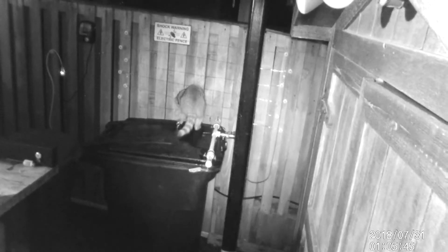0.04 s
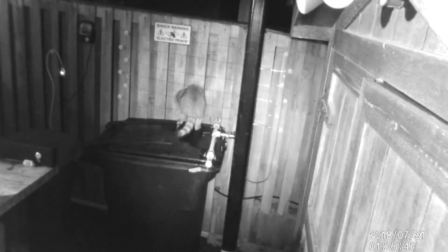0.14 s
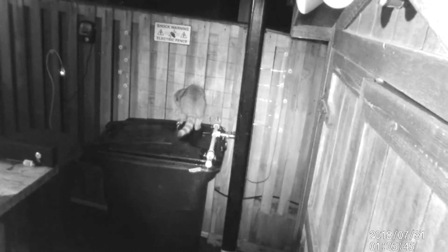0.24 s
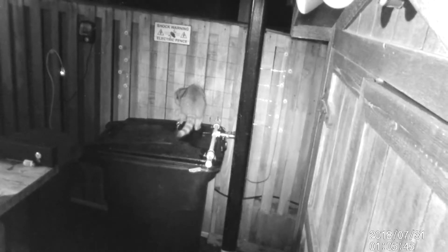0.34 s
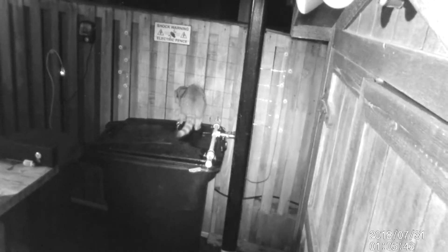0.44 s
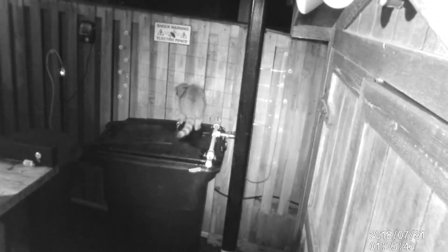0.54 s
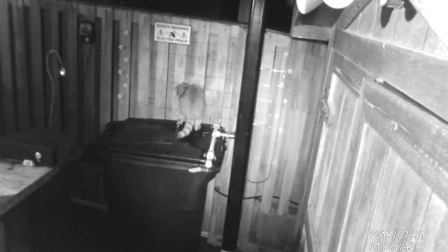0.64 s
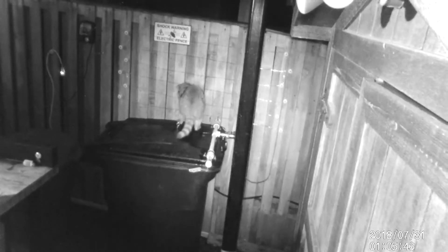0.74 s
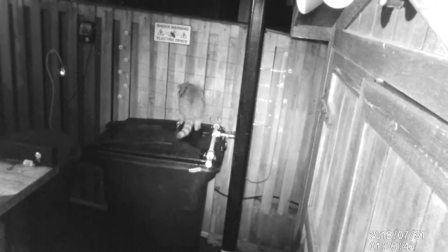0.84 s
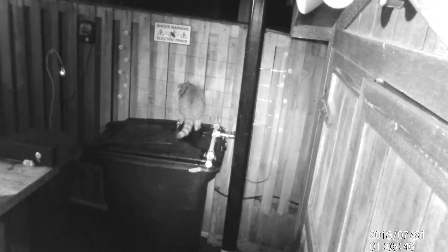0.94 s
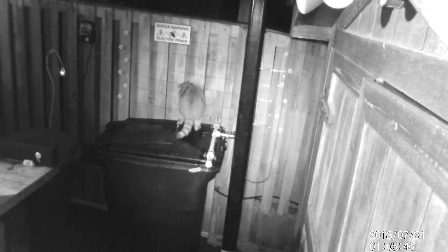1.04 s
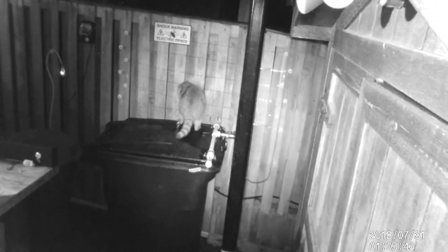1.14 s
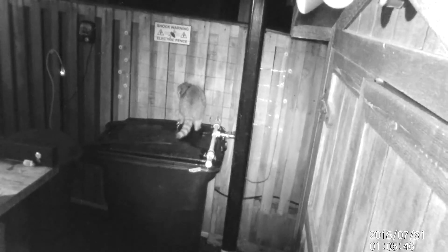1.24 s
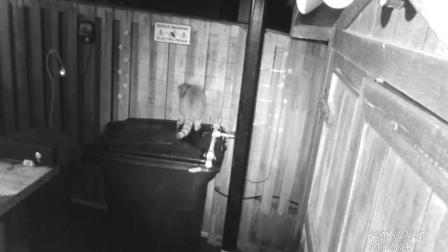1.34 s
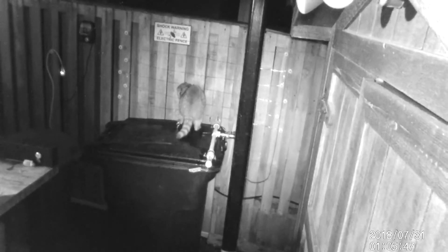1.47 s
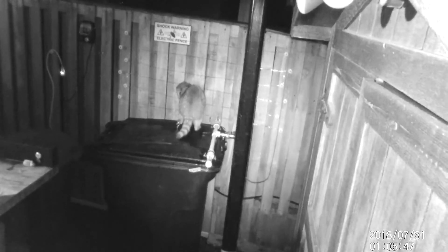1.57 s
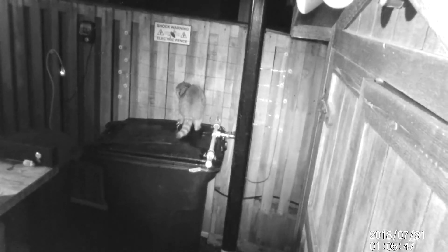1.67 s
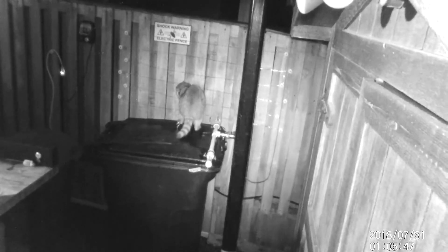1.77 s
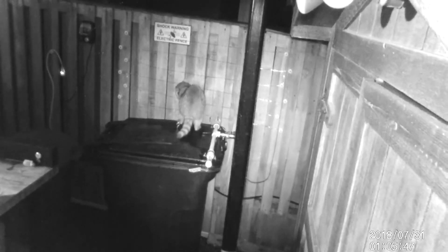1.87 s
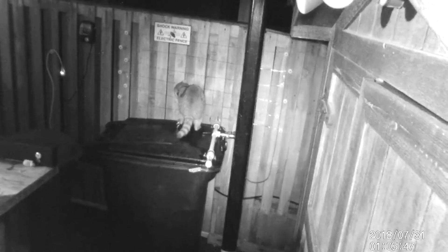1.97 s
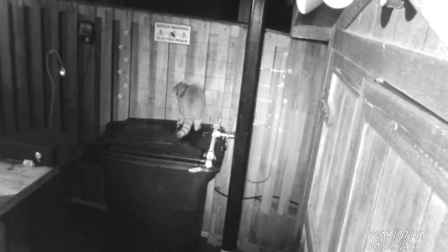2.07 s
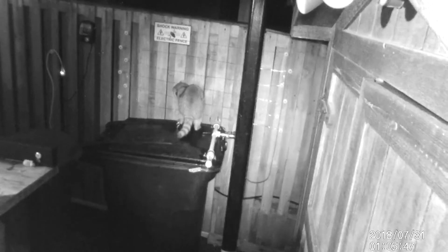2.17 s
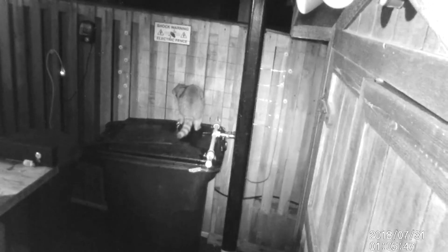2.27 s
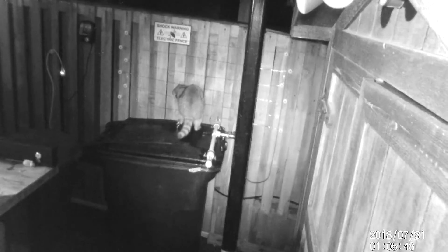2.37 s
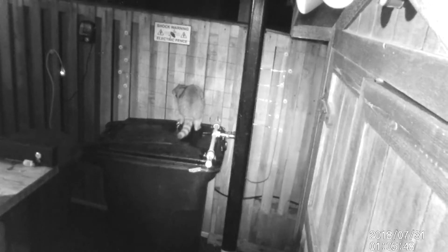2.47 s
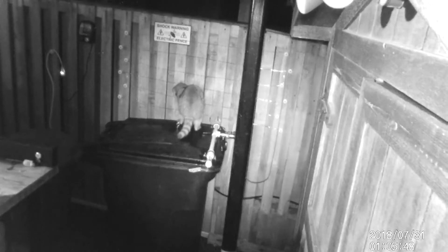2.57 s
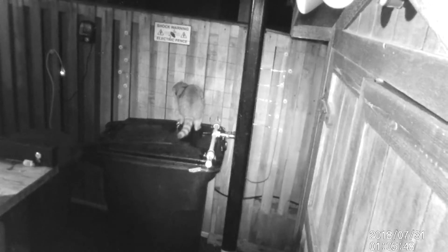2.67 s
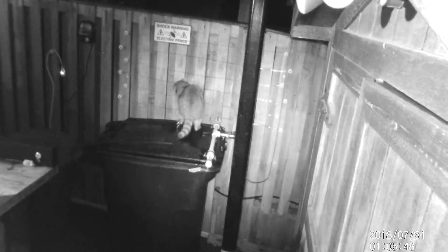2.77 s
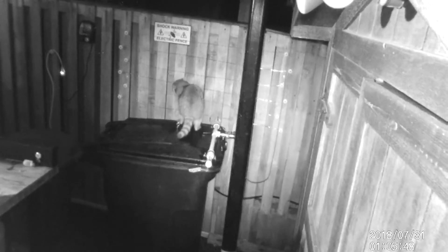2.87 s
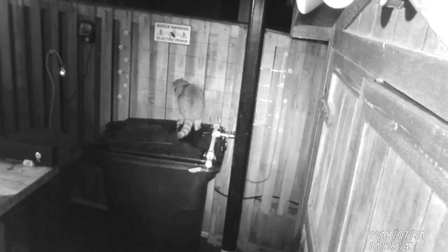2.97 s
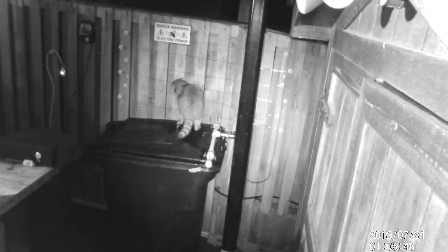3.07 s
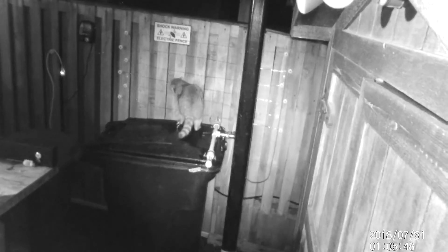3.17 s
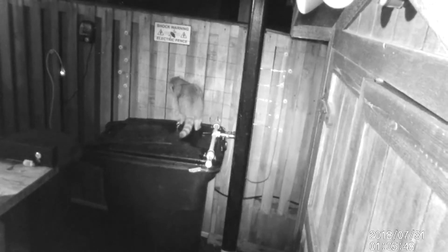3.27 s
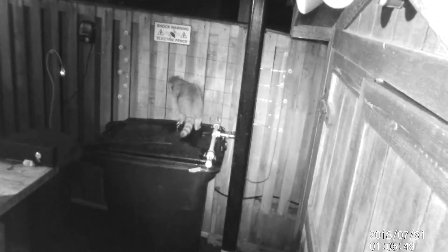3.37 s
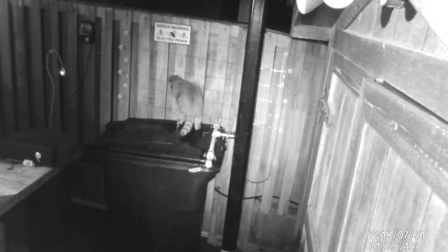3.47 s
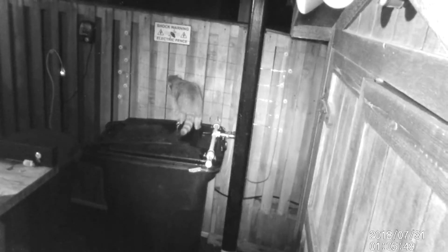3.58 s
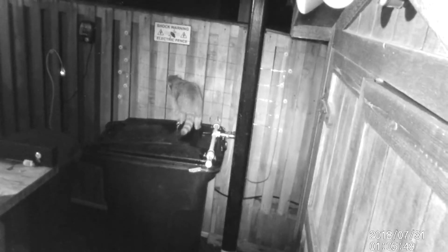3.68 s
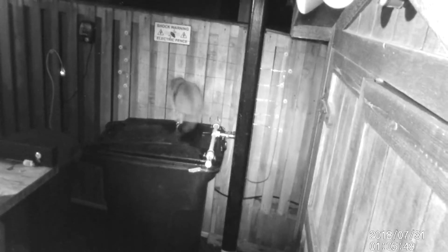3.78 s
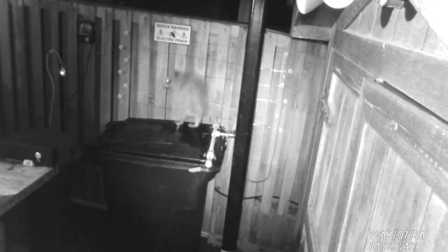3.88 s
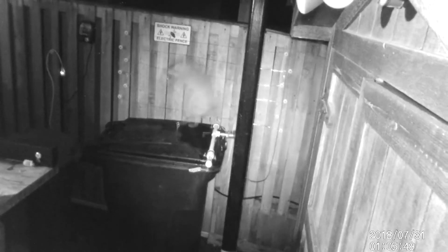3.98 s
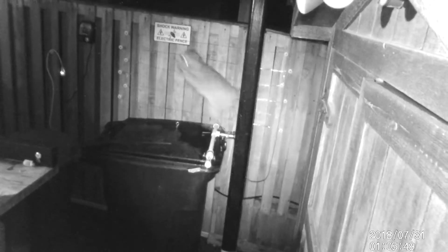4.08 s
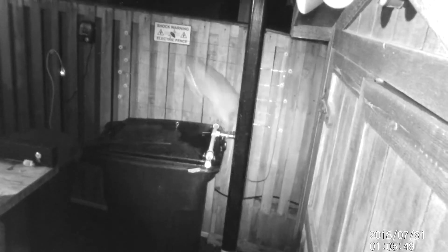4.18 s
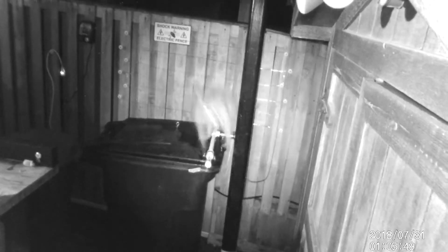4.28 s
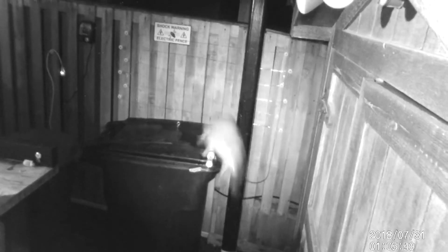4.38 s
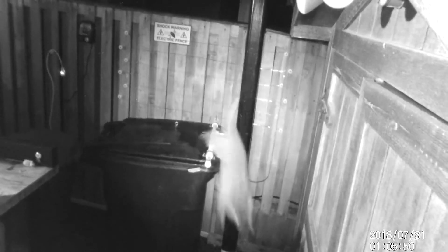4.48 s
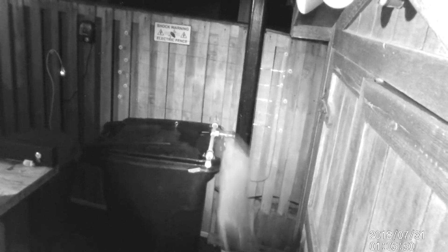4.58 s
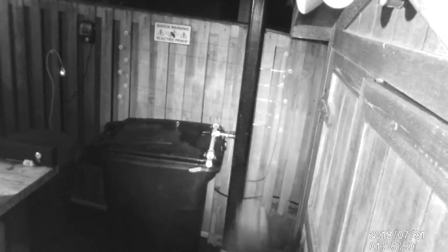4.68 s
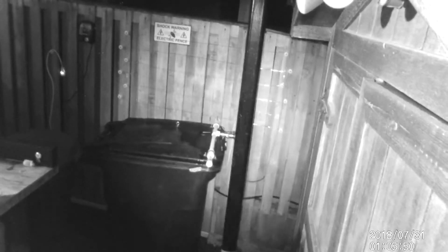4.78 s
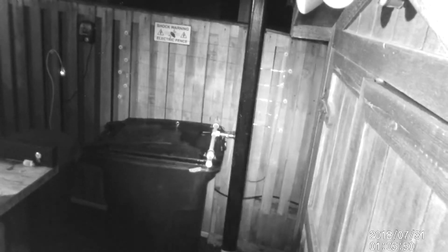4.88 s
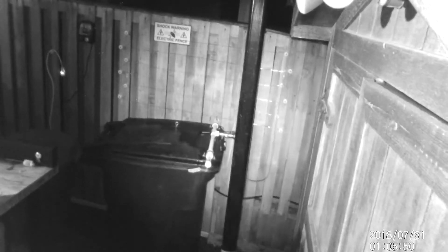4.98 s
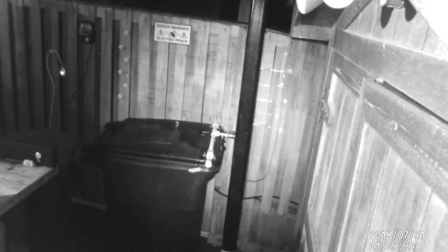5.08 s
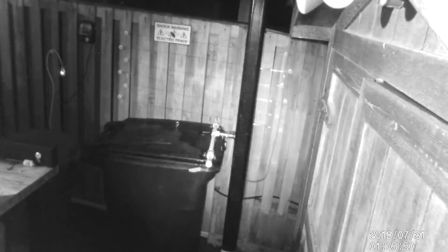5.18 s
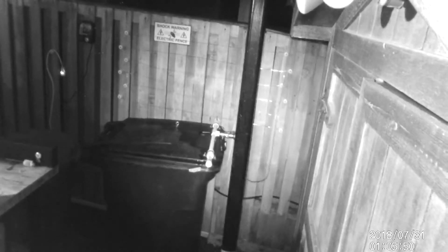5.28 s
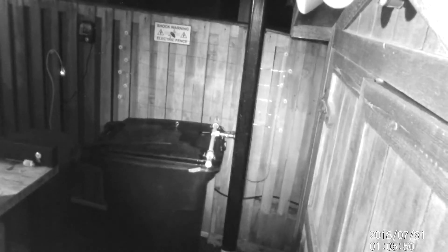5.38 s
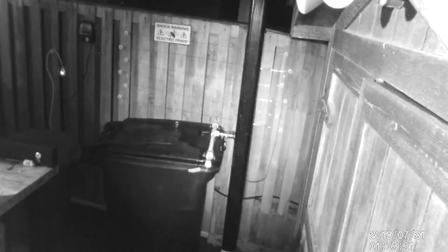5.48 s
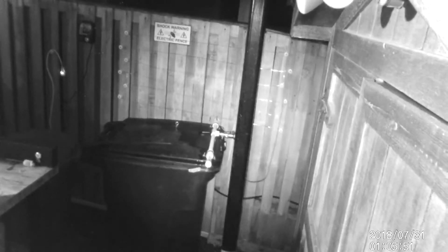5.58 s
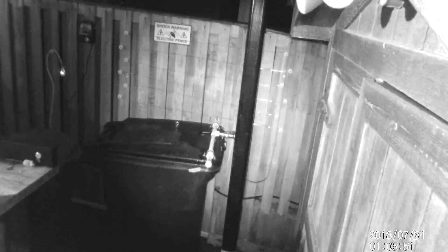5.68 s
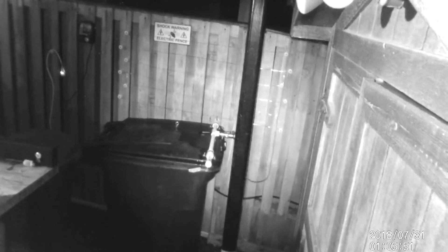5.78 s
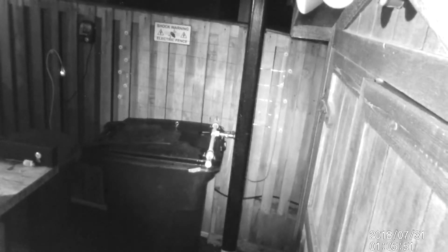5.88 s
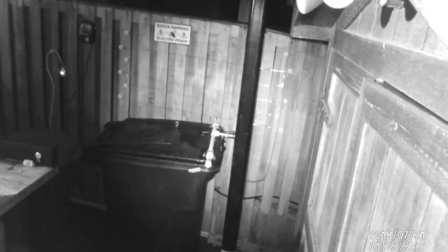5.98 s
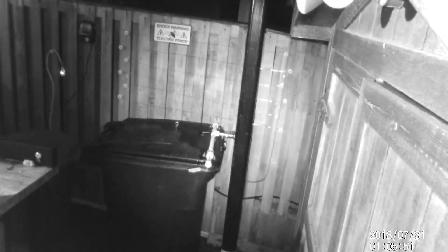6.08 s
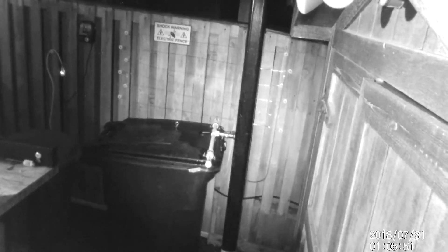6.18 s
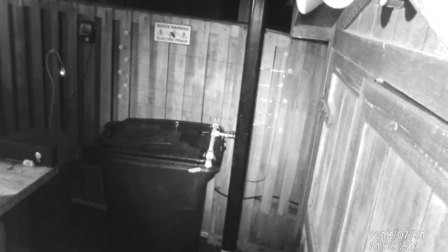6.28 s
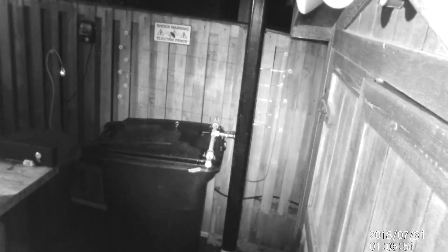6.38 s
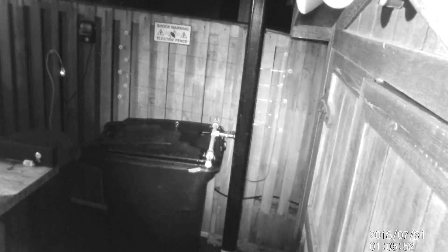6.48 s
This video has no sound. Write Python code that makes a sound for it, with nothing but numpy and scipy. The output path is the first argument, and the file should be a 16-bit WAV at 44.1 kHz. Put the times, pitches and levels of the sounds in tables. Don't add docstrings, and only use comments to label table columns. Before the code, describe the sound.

Quiet night hiss and cricket trills, then sudden clattering claws and booming bin knocks, a loud slapping landing, and faint footsteps running off.

```python
import sys
import numpy as np
from scipy import signal
from scipy.fft import rfft, irfft, next_fast_len
from scipy.io import wavfile
from scipy.ndimage import uniform_filter1d

SR = 44100
rng = np.random.default_rng(int(sys.argv[2]) if len(sys.argv) > 2 else 0)


def transcribe(signal):
    frames = np.atleast_2d(signal).T
    limited = np.clip(frames, -1, 1)
    pcm = np.round(limited * 32767).astype(np.int16)
    wavfile.write(sys.argv[1], SR, pcm)


def decibels_to_gain(level_db):
    exponent = np.asarray(level_db, float) / 20
    return 10 ** exponent


N = 287928
T = np.arange(N) / SR
LANDING_S = 4.95

# frequency_hz, density_db
NIGHT_AIR = [(9, -40.5), (16, -0.5), (35, 0), (60, -0.5), (120, -4), (200, -7.5), (600, -10), (1150, -13.5),
             (1600, -21), (2330, -18), (2700, -21.5), (4000, -27), (4800, -20.5), (5500, -13.5)]
# peak_s, level_db
CHORUS_SURGES = [
    (1.43, -61),
    (1.51, -62),
]
# frequency_hz, level_db
MAINS_HARMONICS = [(947.5, -86.5), (1012, -65), (1130, -75.5), (1190, -67.5), (1308, -72.5), (1486, -73.5),
                   (1841, -72), (1900, -81), (2309, -67), (2611, -79.5), (2934, -71.5), (3031, -75),
                   (3268, -80.5), (4156, -73)]
# start_s, length_s, level_db
TRILLS = [
    (0.066, 0.37, -55.5),
    (2.458, 0.36, -57),
]
# peak_s, level_db
GUSTS = [
    (.1, -55),
    (1.8, -59.5),
    (3.1, -63),
    (3.45, -66.5),
]
# start_s, peak_db,
# pitch_hz, t60_s
CLICKS = [(1.472, -39, 5270, 0.022), (2.984, -41.5, 3870, .02), (3.235, -38, 3200, 0.0066),
          (3.236, -37, 4700, .012), (3.557, -44, 4370, .015), (3.832, -11, 4490, 0.019),
          (3.8335, -9, 3200, 0.015), (3.8352, -7.5, 5080, 0.0075), (3.8375, -17, 2290, 0.0063),
          (3.8935, -10.5, 330, 0.027), (3.9075, -12.5, 420, 0.013), (3.9215, -10.5, 368, 0.017),
          (3.939, -9.5, 330, 0.022), (3.945, -16.5, 299, 0.041), (3.993, -22, 810, 0.057),
          (4.019, -14, 777, 0.049), (4.05, -19, 874, 0.052), (4.154, -15.5, 5170, 0.013),
          (4.1875, -16, 2680, .008), (4.188, -25.5, 1500, .012), (4.192, -16.5, 4380, 0.018),
          (4.2625, -21, 4500, 0.015), (4.273, -7.5, 1860, 0.0014), (4.275, -17.5, 612, 0.021),
          (4.293, -15, 4000, 0.017), (4.369, -16, 300, 0.017), (4.3825, -6.5, 260, 0.019),
          (4.42, -14, 283, 0.046), (4.45, -14, 2480, .012), (4.478, -16, 1500, .02),
          (4.376, -19, 1600, .02), (4.409, -20, 1500, .01), (4.459, -12.5, 356, 0.047),
          (4.6832, -21, 2720, 0.014), (4.684, -24.5, 4850, 0.013), (4.745, -10, 4190, 0.012),
                 (4.7468, -16, 3130, 0.0084), (4.746, -19, 1700, 0.017), (4.753, -14, 4160, 0.009),
                 (4.7875, -7.5, 900, 0.029), (4.789, -14.5, 4860, 0.026), (4.792, -8, 3790, 0.019),
                 (4.801, -9, 1144, 0.022), (4.806, -14.5, 2040, 0.026), (4.794, -13, 2230, 0.027),
                 (4.802, -14.5, 4400, .03), (4.813, -13.5, 764, 0.022), (4.8205, -18, 2100, .02),
                 (4.829, -12, 607, .03), (4.845, -17, 525, .04), (4.8895, -20, 4400, 0.01),
                 (4.953, -25.5, 1246, 0.025), (5.128, -34, 1270, 0.022), (5.45, -40, 2620, 0.018),
                 (5.617, -33, 4700, .03), (5.615, -30, 2200, 0.018), (5.946, -40, 3400, .015),
                 (6.117, -34.5, 700, 0.045), (6.137, -41, 1530, .03), (6.158, -36, 900, .04),
                 (6.191, -42, 1700, 0.026), (6.226, -34, 800, 0.058), (6.254, -38, 2300, .04),
                 (6.197, -29.5, 1100, 0.028), (6.203, -36, 800, 0.045), (6.272, -34, 587, 0.14),
                 (6.3255, -26.5, 623, 0.029), (6.366, -34.5, 760, 0.049), (6.514, -33, 655, 0.032)]
# start_s, peak_db, centre_hz, t60_s
PAW_TICKS = [(1.985, -37.5, 3620, 0.05), (2.312, -44, 3500, .087), (2.984, -48, 3800, 0.054),
             (3.06, -41, 2000, .35), (3.235, -38, 3060, 0.044), (3.557, -36, 4600, 0.078),
             (5.945, -47, 3500, 0.49), (5.946, -27, 5550, 0.12), (6.122, -32, 1570, 0.33),
             (6.195, -32, 1640, 0.36), (6.25, -44, 3400, .12), (6.274, -35, 4200, 0.15),
             (6.328, -33, 1680, 0.18)]
# start_s, peak_db, centre_hz, t60_s
CLAW_SNAPS = [(2.984, -45, 3800, .02), (3.557, -41, 4400, .02), (3.8355, -9, 3550, 0.012),
              (3.997, -15, 4960, 0.091), (4.1885, -15.5, 4020, 0.022), (4.2725, -10, 1520, 0.012),
              (4.7445, -10.5, 3930, .025), (5.45, -35, 2740, .03), (5.615, -41, 2430, .03),
              (6.196, -37, 1500, .03), (6.273, -34, 3800, .03), (6.326, -42, 1300, .03),
              (4.713, -22, 2700, .03), (5.2397, -25.5, 3470, 0.016), (5.9455, -47, 3500, .04)]
# start_s, peak_db, centre_hz, t60_s
LID_CLAWS = [(3.632, -28, 4100, 0.26), (3.7095, -17, 3080, 0.16), (3.7549, -12, 3320, 0.14),
             (3.8114, -13, 1700, 0.061), (3.8315, -2.5, 4100, 0.03), (3.836, -4.5, 2600, 0.069),
             (3.8594, -14, 4460, 0.48), (3.888, -9, 2170, 0.16), (3.9094, -7.5, 2350, 0.078),
             (3.936, -15.5, 1410, 0.096), (4.0233, -14, 2100, 0.21), (4.1444, -14.5, 3320, 0.16),
             (4.153, -12, 4170, 0.034), (4.1869, -13, 4240, 0.29), (4.2623, -8.5, 4200, 0.024),
             (4.2722, -8, 1870, 0.25), (4.2988, -19.5, 1850, 0.13), (4.3355, -12.5, 2150, 0.11),
             (4.384, -15.5, 2740, 0.33), (4.4074, -24.5, 1580, .1), (4.4463, -15, 2220, 0.084),
             (4.4714, -20.5, 1680, 0.2)]
# start_s, peak_db, centre_hz, t60_s
FLIGHT_CLAWS = [(4.6825, -18, 4530, 0.29), (4.697, -16.5, 4220, 0.41), (4.767, -11, 1890, 0.082),
                (4.783, -1, 2260, 0.13), (4.788, -9, 2100, 0.016), (4.7955, -9, 2370, 0.16),
                (4.8194, -10.5, 2300, 0.11), (4.859, -17.5, 4620, 0.18), (4.892, -22.5, 4730, 0.037),
                (4.9319, -16, 4420, 0.15), (5.0394, -27.5, 4440, 0.19), (5.0994, -26, 4550, 0.22),
                (5.289, -29.5, 2680, 0.15), (5.3094, -25, 4930, 0.24), (5.3445, -25, 4400, 0.86),
                (5.3727, -32, 3080, 0.089), (5.3979, -31.5, 4830, .15), (5.448, -33.5, 2880, .08),
                (5.5833, -32, 4740, 0.16), (5.6151, -26.5, 2860, 0.19), (6.4383, -20.5, 4900, 0.2),
                (6.4594, -22, 4580, 0.13)]
# time_s, claw_drag_db, weight_on_lid_db
SCRAMBLE = [
    (3.57, -55, -54),
    (3.72, -49.5, -41.5),
    (3.83, -18.5, -25.5),
    (4.01, -35.5, -27.5),
    (4.09, -39, -37.5),
    (4.21, -48.5, -29),
    (4.33, -22.5, -24.5),
    (4.52, -34, -29.5),
    (4.6, -47, -48.5),
]
# time_s, claw_drag_db, weight_on_boards_db
FLIGHT = [
    (4.66, -47.5, -44),
    (4.92, -36, -39.5),
    (5.14, -46, -52),
    (5.3, -49, -55),
    (5.44, -62, -64),
    (5.7, -51.5, -66),
    (6.05, -49.5, -53),
    (6.23, -47.5, -41.5),
    (6.53, -55, -52),
]
# frequency_hz, density_db
SCRAPE_COLOUR = [(500, -16.5), (900, -2.5), (1500, -3), (2200, -2.5), (3200, -1), (4400, -1.5), (5500, -6)]
# frequency_hz, width_hz, level_db
BIN_MODES = [(214, 27, 0.5), (330, 136, 0), (530, 65, -8), (780, 51, -3.5)]
# frequency_hz, width_hz, level_db
BOARD_MODES = [(274, 77, -4.5), (565, 69, -3), (797, 180, -6), (1120, 140, -8.5), (1650, 1100, -15.5)]
# start_s, peak_db, pitch_hz, t60_s
LOOSE_PARTS = [(3.65, -38, 2100, 0.2), (3.832, -12, 4130, 0.033), (4.0, -21.5, 761, 0.2),
               (4.37, -14.5, 214, 0.26), (4.746, -23, 4140, 0.035), (4.79, -22.5, 2080, 0.13),
               (5.24, -40, 3360, 0.06), (5.345, -44, 2950, .11), (5.37, -43, 3100, .11),
               (5.95, -38.5, 3550, 0.28), (5.95, -43, 2370, .2), (6.255, -43, 3420, .1),
               (5.45, -51, 2630, .07), (6.118, -46, 604, .14), (6.2, -35, 720, 0.33),
               (6.272, -32, 586, 0.26), (6.278, -44, 3750, 0.21), (6.278, -41, 4650, 0.13),
               (6.33, -43, 680, 0.19), (6.44, -43, 2100, 0.17), (6.44, -39, 1430, 0.11),
               (6.44, -40, 2540, 0.2), (6.442, -33, 2860, 0.24), (6.442, -31, 4830, 0.3),
               (6.445, -34, 4150, .24)]
# start_s, peak_db, centre_hz, t60_s
BIN_PAWS = [(3.744, -23, 274, 0.25), (3.815, -21, 202, 0.04), (3.887, -11, 510, 0.19),
            (3.904, -7, 219, 0.52), (3.927, -14.5, 232, 0.2), (3.989, -8.5, 516, 0.25),
            (4.02, -17.5, 734, 0.11), (4.049, -27, 794, 0.069), (4.079, -21, 424, 0.081),
            (4.109, -18, 227, 0.091), (4.151, -17, 294, 0.32), (4.19, -17.5, 208, 0.099),
            (4.231, -20.5, 285, 0.07), (4.264, -11, 570, 0.062), (4.288, -19, 397, 0.07),
            (4.349, -11.5, 353, 0.24), (4.374, -8.5, 189, 0.04), (4.384, -10.5, 230, 0.12),
            (4.407, -8.5, 240, 0.12), (4.445, -12, 526, 0.11), (4.476, -14, 302, 0.12),
            (4.497, -16, 378, 0.074), (4.539, -28, 423, 0.15)]
# start_s, peak_db, centre_hz, t60_s
LANDING_BLOWS = [
    (4.7075, -0.5, 422, 0.026),
    (4.709, -11, 150, 0.043),
    (4.714, -12, 806, 0.18),
    (4.722, -12, 336, 0.031),
    (4.771, -13, 290, 0.18),
    (4.7835, 1.5, 423, 0.073),
    (4.792, -5.5, 200, 0.15),
    (4.811, -4, 720, 0.084),
    (4.839, -13, 224, 0.078),
    (4.952, -19.5, 990, 0.02),
]
# start_s, peak_db, centre_hz, t60_s
STEPS = [
    (5.124, -32.5, 570, 0.047),
    (5.848, -41, 570, 0.066),
    (6.115, -27, 680, 0.3),
    (6.19, -31, 1000, 0.2),
    (6.269, -33, 624, 0.071),
    (6.323, -33, 606, 0.071),
    (6.359, -40, 750, 0.12),
    (6.509, -37.5, 643, 0.11),
]
# frequency_hz, width_hz, level_db
BOOM_MODES = [(60.6, 22, 0), (85, 81, -4.5)]
# peak_s, level_db
HEAVES = [
    (3.81, -33.5),
    (3.9, -25.5),
    (4.21, -28),
    (4.36, -24),
    (4.48, -23),
    (4.81, -31),
    (4.92, -46),
    (5.03, -41.5),
    (5.3, -46.5),
]
# frequency_hz, level_db, t60_s
SHEET_MODES = [(1840, -3, 0.2), (2180, -2.5, 0.3), (2444, -12, 0.28), (2790, -5, 0.1), (3170, -17, 0.21),
               (3480, -23, 0.18), (4050, -9, 0.12), (4390, -17, .3), (5040, -11, .24), (5160, -3, .09),
               (5230, -11.5, 0.34)]
# start_s, level_db
SHEET_KNOCKS = [
    (6.438, -30.5),
    (6.4415, -36),
    (6.462, -40),
]


def level(x, db):
    return x * decibels_to_gain(db) / np.sqrt(np.mean(x ** 2))


def curve(table):
    s, *columns = np.transpose(table)
    return [np.interp(T, s, c, left=-120) for c in columns]


def ring(x, hz, width_hz):
    return signal.lfilter(*signal.iirpeak(min(hz, 7000), hz / width_hz, fs=SR), x)


def body(x, modes):
    return sum((-1) ** k * decibels_to_gain(db) * ring(x, hz, width) for k, (hz, width, db) in enumerate(modes))


def highpass_or_low(x, kind):
    return signal.sosfilt(signal.butter(4, 4700, kind, fs=SR, output="sos"), x)


def colour(x, points):
    hz, db = np.transpose(points)
    padded = np.pad(x, 2048, mode="reflect")
    f = np.maximum(np.fft.rfftfreq(len(padded), 1 / SR), 1)
    gain = decibels_to_gain(np.interp(np.log(f), np.log(hz), db))
    return irfft(rfft(padded) * gain, len(padded))[2048:-2048]


def walk(rate):
    k = int(SR / rate)
    x = np.repeat(rng.standard_normal(N // k + 1), k)
    x = uniform_filter1d(uniform_filter1d(x, k), k)[:N]
    return x / x.std()


def grit(rate, scatter_db):
    hit = rng.random(N) < rate / SR
    size = rng.exponential(size=N)
    return hit * rng.standard_normal(N) * decibels_to_gain(scatter_db * size)


def swells(events, rise_db_s, fall_db_s):
    return sum(decibels_to_gain(db - np.maximum(rise_db_s * (s - T), fall_db_s * (T - s))) for s, db in events)


def tailed(events, noise_db, broad_db):
    return [(*row, noise_db, broad_db) for row in events]


def strikes(events, q, push_cycles, rise_s, grain, wide_hz, wide_width_hz):
    out, t = np.zeros(N + SR // 2), T[:SR // 2]
    for s, db, hz, t60, tail_db, wide_db in events:
        noise = rng.standard_normal(len(t))
        noise = noise * np.abs(noise) ** grain
        fade = np.exp(-np.log(1000) * t / np.clip(t60, 0.01, 0.5)) * -np.expm1(-t / rise_s)
        push = np.sin(np.pi * np.minimum(t * hz / push_cycles, 1))
        knock = -ring(ring(push, hz, hz / q), hz, 4.0 * hz)
        pitched = ring(ring(noise, hz, hz / q / 2), hz, 2 * hz / q)
        broad = ring(noise, wide_hz, wide_width_hz)
        tail = (pitched / pitched.std() + decibels_to_gain(wide_db) * broad / broad.std()) * fade
        one = knock / np.abs(knock).max() + decibels_to_gain(tail_db) * tail / np.abs(tail).max()
        start = int((s + 0.001) * SR)
        out[start:start + len(t)] += decibels_to_gain(db) * one / np.abs(one).max()
    return out[:N]


def chimes(events):
    out = np.zeros(N)
    for s, db, hz, t60 in events:
        span = slice(int(s * SR), int(s * SR) + SR // 2)
        t = np.clip(T[span] - s, 0, 1)
        out[span] += decibels_to_gain(db) * np.sin(2 * np.pi * hz * t) * 1000 ** (-t / np.clip(t60, 0.002, 0.4))
    return out


def air_and_insects():
    air = level(colour(rng.standard_normal(N), NIGHT_AIR), -42.5)
    low, chorus = highpass_or_low(air, "low"), highpass_or_low(air, "high")
    surge = level(ring(chorus, 5410, 250) * decibels_to_gain(2.5 * walk(79.8)), 0)
    surge = surge * swells(CHORUS_SURGES, rise_db_s=101, fall_db_s=91)
    return low * decibels_to_gain(0.21 * walk(2.2)) + chorus * decibels_to_gain(0.73 * walk(2.6) + 0.48 * walk(64)) + surge


def mains_buzz():
    buzz = decibels_to_gain(-60.0) * np.sin(2 * np.pi * 71.0 * T) + decibels_to_gain(-61.5) * np.sin(2 * np.pi * 118.8 * T)
    for hz, db in MAINS_HARMONICS:
        buzz = buzz + np.sqrt(2) * decibels_to_gain(db) * np.sin(2 * np.pi * (hz * T + rng.random()))
    return buzz


def fan():
    tone = np.sin(2 * np.pi * np.cumsum(213.5 + 1.05 * walk(2.92)) / SR)
    return np.sqrt(2) * tone * decibels_to_gain(-57 - 46 * np.maximum(T - 2.63, 0))


def cricket():
    on = np.zeros(N)
    for s, length, db in TRILLS:
        on += decibels_to_gain(db) * np.clip(np.minimum((T - s) / 0.035, (s + length - T) / 0.07), 0, 1)
    strokes = 1 + 0.2 * np.cos(2 * np.pi * np.cumsum(84 + 3.0 * walk(15)) / SR)
    wings = np.sin(2 * np.pi * 4445 * T) + 0.64 * np.sin(2 * np.pi * np.cumsum(4487 + 4 * walk(10)) / SR)
    rasp = level(ring(rng.standard_normal(N), 4460, 170), -5)
    return level(strokes * (wings + rasp) * decibels_to_gain(1.1 * walk(39.7)), 0) * on


def leaves():
    return level(ring(grit(3000, 0.5), 3100, 1100), 0) * swells(GUSTS, rise_db_s=28, fall_db_s=19)


def night():
    return air_and_insects() + mains_buzz() + fan() + cricket() + leaves()


def clicks():
    return chimes(CLICKS)


def claws():
    events = tailed(LID_CLAWS, 1, 14) + tailed(FLIGHT_CLAWS, 0.9, 2.5)
    events = events + tailed(PAW_TICKS, 4, -8.5) + tailed(CLAW_SNAPS, -3.5, 0)
    return strikes(events, q=1.97, push_cycles=0.48, rise_s=0.0011, grain=0.87,
                   wide_hz=3150, wide_width_hz=3600)


def scrape(drag_db):
    return level(colour(grit(6000, 1.1), SCRAPE_COLOUR), 0) * decibels_to_gain(drag_db + 2.0 * walk(36))


def drum(weight_db):
    blows = ring(grit(700, 1.8), 500, 1100)
    on_bin = level(body(blows, BIN_MODES) + decibels_to_gain(-8.5) * ring(blows, 440, 1100), 0)
    on_boards = level(body(blows, BOARD_MODES), 0)
    return np.where(T < LANDING_S, on_bin, on_boards) * decibels_to_gain(weight_db)


def loose_parts():
    return strikes(tailed(LOOSE_PARTS, -1.1, -23.5), q=12.0, push_cycles=0.48, rise_s=0.00065, grain=0.3,
                   wide_hz=2000, wide_width_hz=3000)


def paws():
    events = tailed(BIN_PAWS, -1, -0.44) + tailed(LANDING_BLOWS, -6.5, -1.4) + tailed(STEPS, 0, 0)
    return strikes(events, q=2.73, push_cycles=0.54, rise_s=0.0014, grain=2.54,
                   wide_hz=610, wide_width_hz=480)


def boom():
    rumble = level(ring(body(grit(900, 0.8), BOOM_MODES), 62, 80), -2)
    return rumble * swells(HEAVES, rise_db_s=197, fall_db_s=115)


def sheet():
    events = []
    for s, db in SHEET_KNOCKS:
        events += [(s, db + mode_db, hz, t60) for hz, mode_db, t60 in SHEET_MODES]
    return chimes(events)


def raccoon():
    drag_db, weight_db = curve(SCRAMBLE + FLIGHT)
    touches = clicks() + claws() + paws()
    return touches + scrape(drag_db) + drum(weight_db) + loose_parts() + boom() + sheet()


def pen(x):
    t60_s, t = 0.25, T[:SR // 2]
    bright, dull = rng.standard_normal((2, len(t)))
    echo = bright * 1000 ** (-t / (1.37 * t60_s)) + 1.74 * ring(dull, 570, 1600) * 1000 ** (-t / t60_s)
    echo = echo * (t > 0.004)
    return signal.fftconvolve(x, decibels_to_gain(-10) * echo / np.sqrt(np.sum(echo ** 2)))[:N]


def scene():
    animal = raccoon()
    near = colour(animal + pen(animal), [(25, 8.5), (60, -1.0), (4600, 0), (5100, -3.5), (5500, -8.5)])
    return (near + night())[None]


def overload(x, top):
    return top * np.tanh(np.abs(x / top) ** 6) ** (1 / 6) * np.sign(x)


def fold_over(x):
    heard = colour(x, [(5490, 0), (5512, -3), (5560, -40), (6200, -120)])
    sampled = 4 * heard * (np.arange(N) % 4 == 0)
    return colour(sampled, [(4600, -0.5), (5500, 4.0), (6100, -11.0), (6600, -28.5), (7000, -38.5),
                            (7500, -52), (8500, -130)])


def fill_top(x):
    upper = signal.hilbert(colour(x, [(3000, -50), (3700, -6.5), (6300, 3.0)]), next_fast_len(N))[:N]
    for shift_hz, db in [(3920, -34.5), (5900, -54.0), (7700, -47.5), (10000, -58.0)]:
        x = x + decibels_to_gain(db) * np.real(upper * np.exp(2j * np.pi * shift_hz * T))
    return x


def low_pass(x):
    return signal.sosfilt(signal.butter(12, 15700, fs=SR, output="sos"), x)


def record(dry):
    x = fill_top(fold_over(overload(dry[0], 0.95)))
    mix = overload(x, 0.72) + 0.0044
    return low_pass(mix[None])


dry = scene()
out = record(dry)
transcribe(out)
```